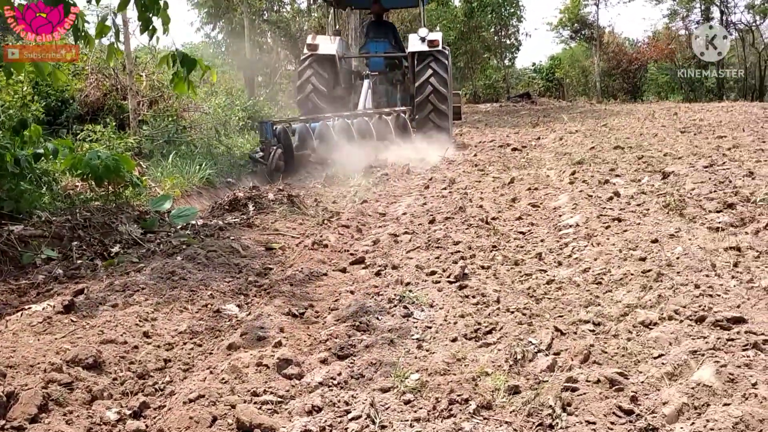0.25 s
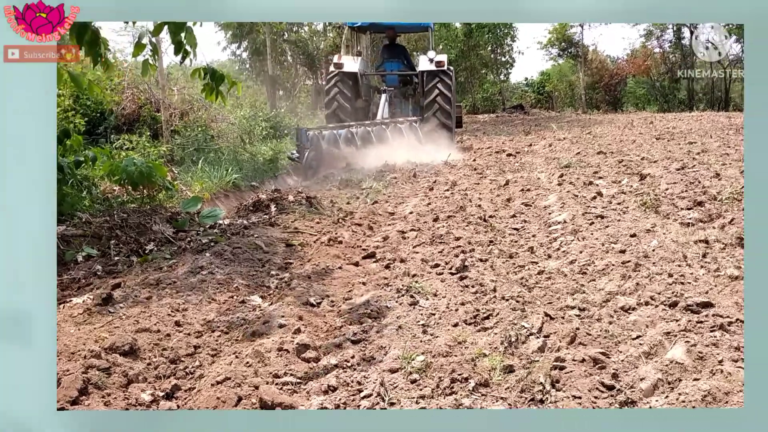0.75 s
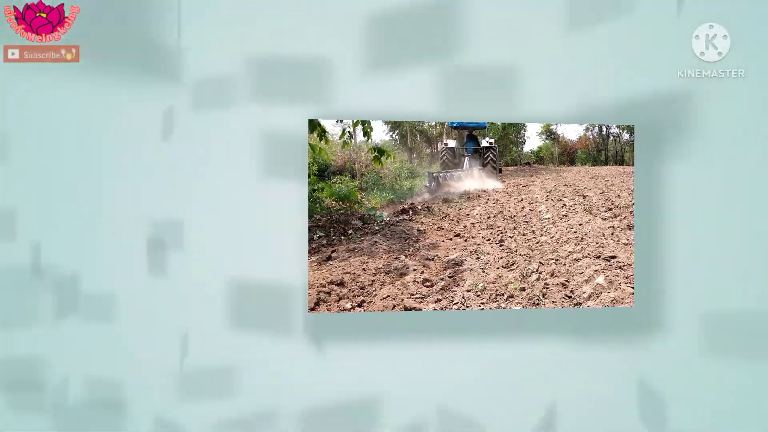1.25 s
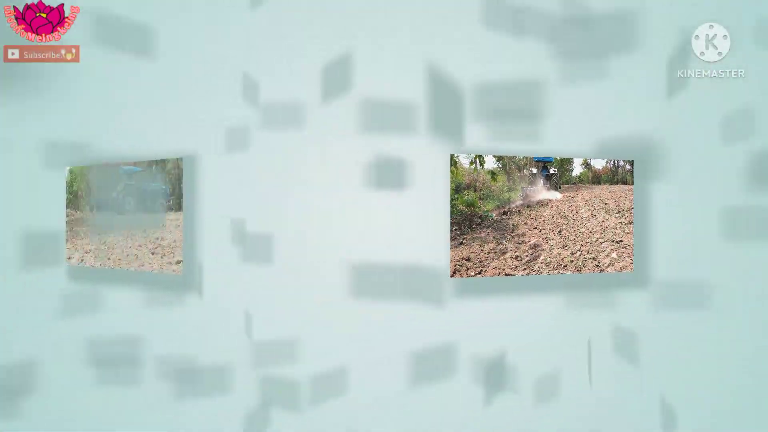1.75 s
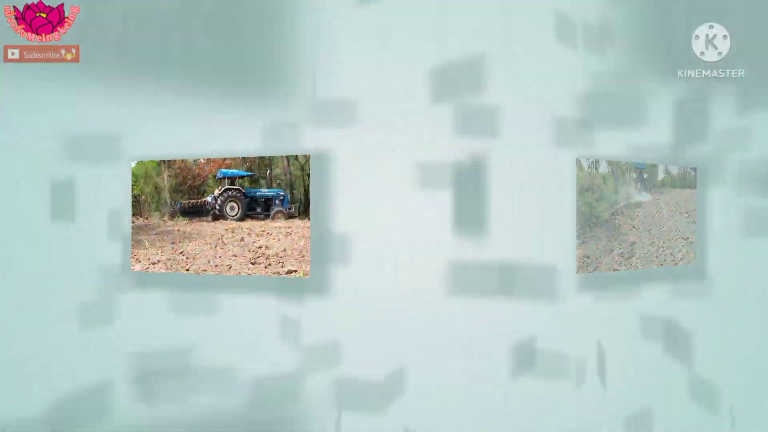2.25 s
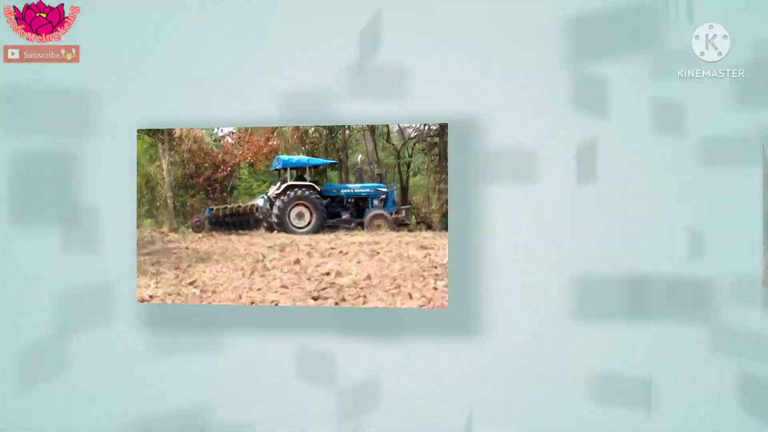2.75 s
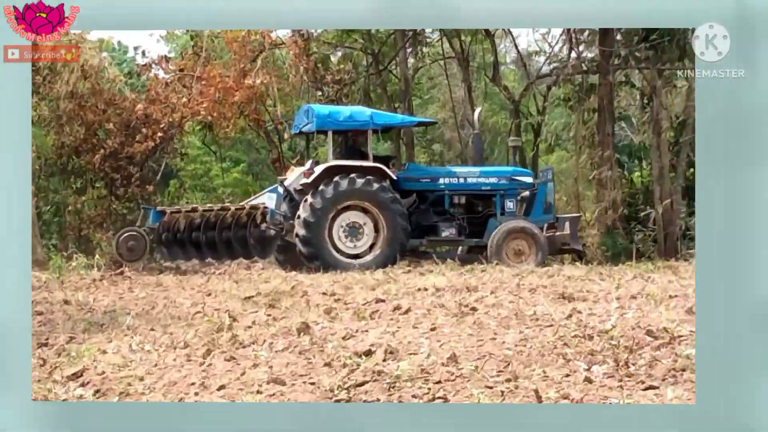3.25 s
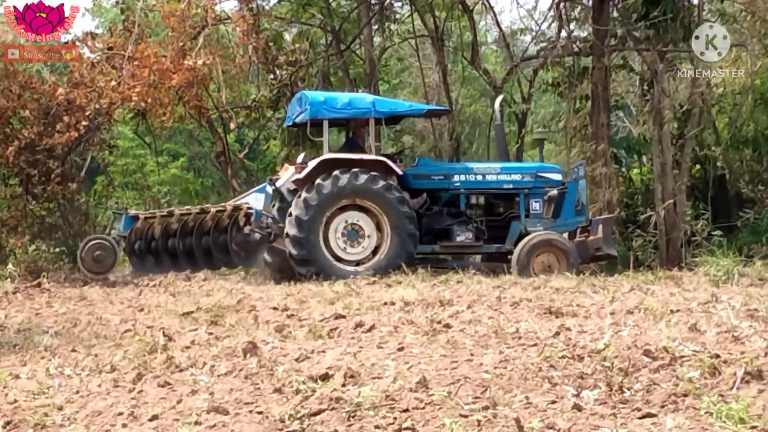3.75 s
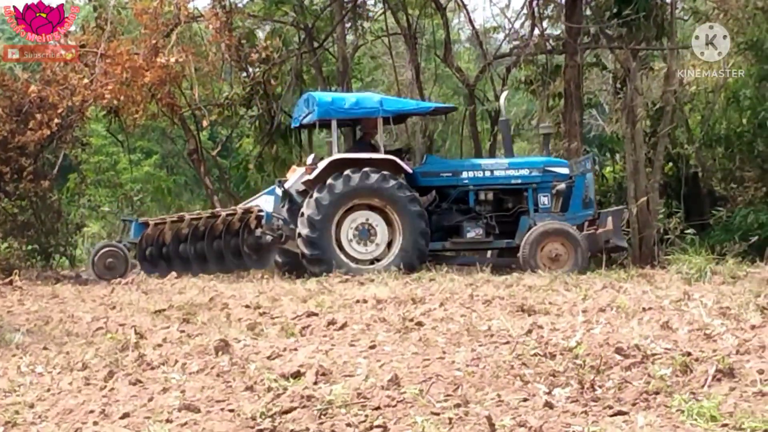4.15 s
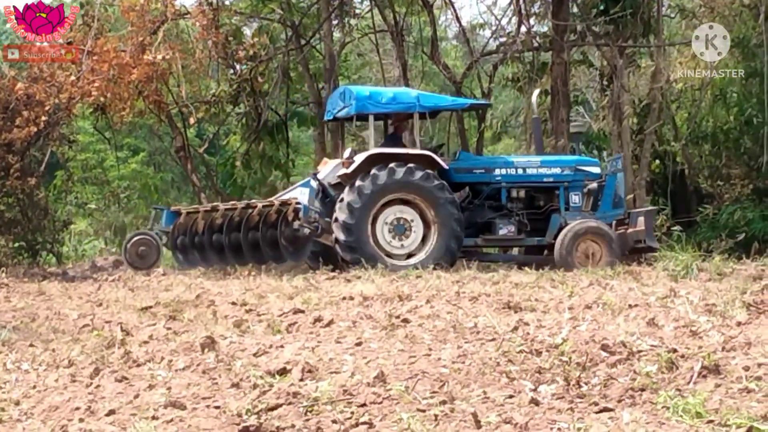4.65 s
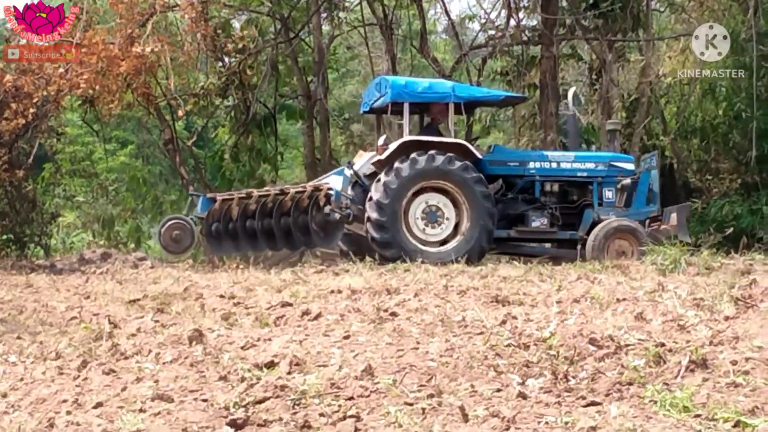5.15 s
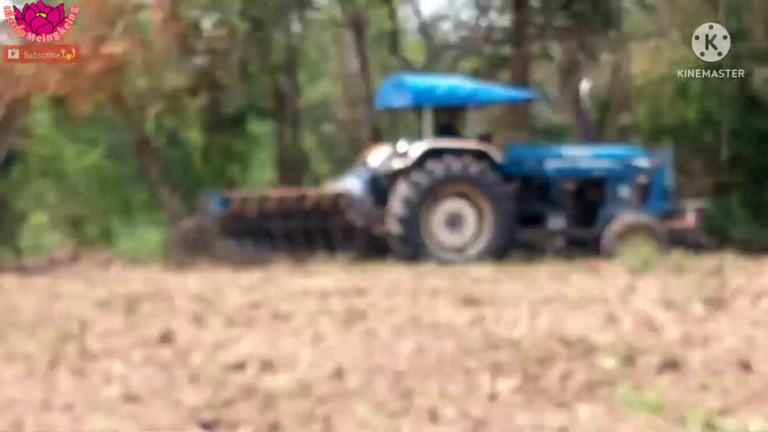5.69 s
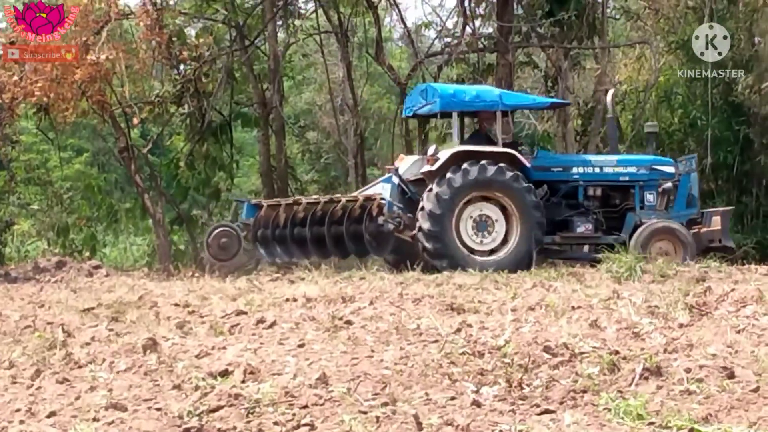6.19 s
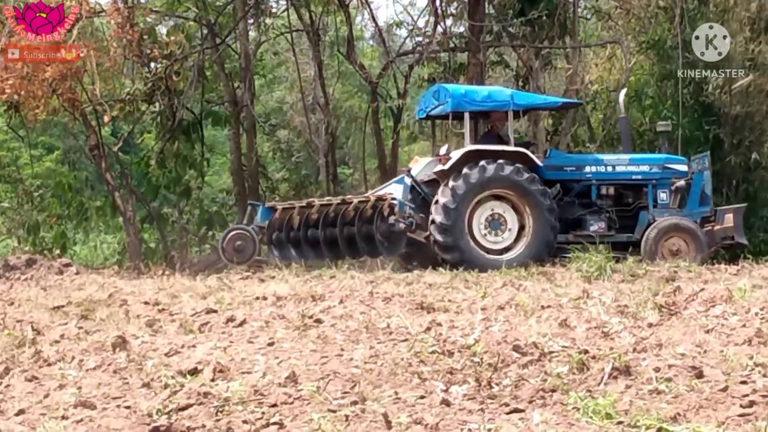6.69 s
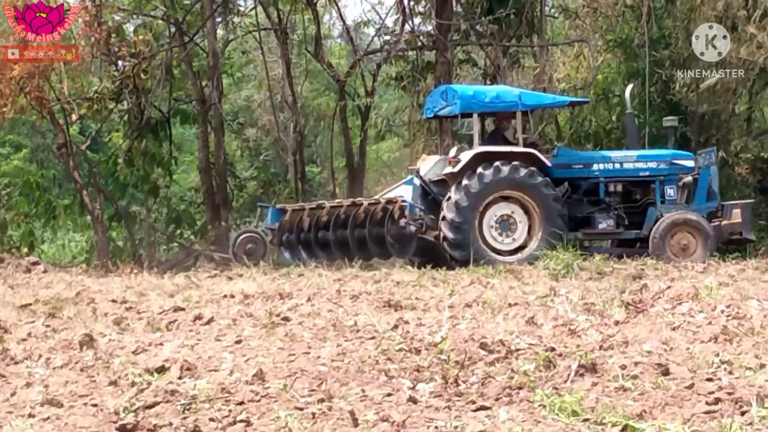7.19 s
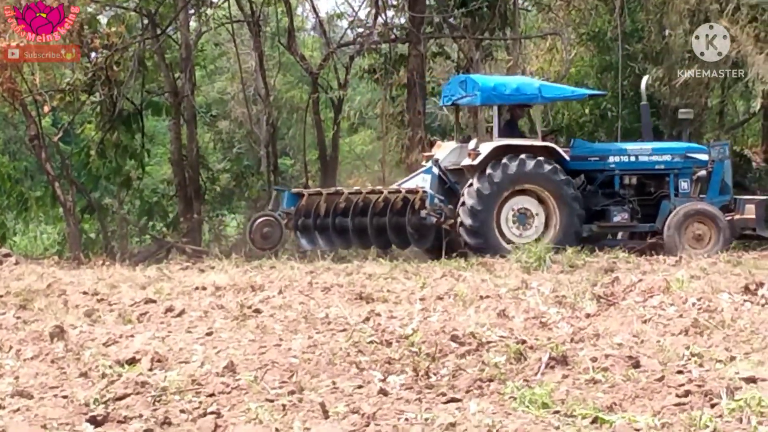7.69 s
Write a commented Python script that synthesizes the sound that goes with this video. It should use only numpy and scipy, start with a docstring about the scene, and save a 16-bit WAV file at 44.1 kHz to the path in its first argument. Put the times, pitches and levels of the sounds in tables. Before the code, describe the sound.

A diesel tractor close by drones and knocks steadily as it pulls a disc harrow through dry soil, with stones crunching and ringing against the discs. It recedes and blends into a quieter tractor farther off, chugging and clattering at low, slightly uneven revs with soft exhaust puffs. Faint stone ticks continue across the open field. Light wind buffets the microphone, gusting near the end.

```python
"""Exhaust drone, knocking block and discs grinding through clods and stones: a four-cylinder diesel
tractor, close by, pulls a disc harrow hard through dry, sandy soil. It fades into the tractor farther
off at low revs, chugging and puffing. Each firing pulses the exhaust and rings the block and panels.
Stones ring the discs, the frame clinks, a dry bearing chirps.
Light wind buffets the microphone, gusting at the end."""
import sys
import numpy as np
from scipy import signal
from scipy.fft import rfft, irfft, next_fast_len
from scipy.io import wavfile
from scipy.ndimage import map_coordinates

SR = 44100
rng = np.random.default_rng(int(sys.argv[2]) if len(sys.argv) > 2 else 0)


def transcribe(u):
    """Save the signal u as a 16-bit wav file named by the first command-line argument.

    u: samples, shape (n,) or (channels, n), limited to [-1, 1]; the rate is SR.
    q: integer samples, one column per channel.
    """
    v = np.clip(np.atleast_2d(u).T, -1, 1)
    q = np.round(v * 32767).astype(np.int16)
    wavfile.write(sys.argv[1], SR, q)


N = 349713

# wind spectrum: f/Hz, density/dB
BUFFET_SPECTRUM = [(10, 4), (22, 0), (50, 1), (70, -1), (120, -5), (200, -26), (500, -60)]
# gusts: t/s, level/dB, half length/s
GUSTS = [(7.33, -51, 0.17), (7.646, -41.5, 0.048), (7.9, -47, 0.17)]
# frame clinks: t/s, relative level/dB
CLINKS = [(2.369, -27.5)]
# steel frame modes: f/Hz, level/dB, t60/s
FRAME_MODES = [(2380, -4, 0.045), (2940, 0, 0.063), (3200, 3, 0.038), (4770, -14, 0.046), (6240, -11, .04),
               (8250, -1, 0.04), (8550, -8, .05), (9830, -6, 0.043)]
# bearing chirps: t/s, relative level/dB, upper tone's power share
CHIRPS = [(2.989, -60, 0.6), (3.115, -55, .2), (3.745, -56.5, .2), (6.9, -62, .5), (7.13, -65, 0.7),
          (7.21, -62, .1)]
# large stones and clods on the discs: t/s, level/dB, crunch centre/Hz, swell/s, t60/s
STONE_HITS = [(.012, -36.5, 2780, .005, .06), (.12, -30.5, 1900, .005, .09),
              (.341, -35, 14120, .001, 0.031), (.606, -32, 2610, 0.0022, .04),
              (.722, -36, 3800, .015, 0.078), (.785, -25, 2090, .0007, .035), (.794, -39, 2000, .002, .05),
              (.85, -44, 2300, .004, .05), (.881, -29, 2000, .002, 0.033), (.98, -42, 3850, .006, .07),
              (1.005, -35, 3180, .004, 0.061), (1.036, -43, 8000, .003, 0.054),
              (1.818, -36, 2300, .03, 0.17), (2.158, -49, 11400, .001, .037),
              (2.232, -45, 3000, .005, 0.087), (2.368, -41.5, 4440, 0.00088, 0.062),
              (2.43, -51.5, 6000, .008, 0.078), (2.464, -41, 2040, 0.0018, .06),
              (3.617, -58.5, 7950, .003, .07), (3.745, -57, 2470, .006, .1), (4.305, -62, 6250, .003, .08),
              (4.437, -64, 5600, .003, 0.091), (4.707, -62, 6300, .002, .08),
              (5.122, -59, 6080, .002, 0.063), (5.267, -58, 7500, .002, .08),
              (5.377, -55, 11400, .003, .09), (5.543, -59, 7900, .002, .08),
              (5.682, -49.5, 2350, .0007, .05), (6.232, -61, 5780, .002, .08),
              (6.52, -60.5, 6000, .002, 0.07), (6.778, -60, 11400, .002, .07),
              (7.353, -61, 8430, .002, 0.073), (7.493, -58.5, 8430, .002, 0.07),
              (7.637, -55, 8440, .002, 0.061), (7.709, -48, 2210, .0007, 0.046),
              (7.781, -56.5, 8400, .003, .11)]
# disc modes: f/Hz, width/Hz, level/dB
DISC_MODES = [(1900, 250, 9), (2620, 490, 1.5), (3190, 115, 3.5), (4240, 140, -3), (5670, 390, -0.5),
              (6530, 250, -7), (7720, 200, 0.5), (8460, 150, 5.5), (10940, 400, -5.5)]
# spectra of soil, far clatter and hiss: f/Hz, density/dB
SOIL_SPECTRUM = [(100, 4), (190, -0.5), (290, 2), (390, -7), (700, -7), (1000, -4.5), (1350, -4),
                 (1950, 0.5), (2350, -2.5), (2850, -3.5), (3600, -10), (6200, -16.5), (8300, -11),
                 (9800, -16), (15500, -13.5)]
CLATTER_SPECTRUM = [(130, 9), (215, -5.5), (310, -6), (440, -7), (620, -1.5), (740, -4), (1020, 3),
                    (1400, -3), (1730, -5), (2350, -4.5), (3100, -3), (4000, -12), (6000, -19.5),
                    (8100, -17.5), (12000, -23.5)]
HISS_SPECTRUM = [(500, -24), (2000, 9.5), (4600, 1.5), (5700, -2.5), (8000, -0.5), (12500, -3), (15500, 2)]
# echoes off wheels, bonnet and ground: delay/s, gain
ECHOES = [(.0019, 0.015), (.0031, 0.039), (.0053, 0.22)]
# engine speed; the far one hunts as the discs bite and come free: t/s, firing rate/Hz
FAR_FIRING_HZ = [(2.8, 32.59), (3.27, 28.25), (4.24, 29.16), (4.44, 31.3), (4.72, 28.5), (4.97, 29.37),
                 (5.21, 27.16), (5.33, 28.95), (6.2, 29.26), (6.39, 27.6), (7.14, 29.26), (7.93, 27.22)]
NEAR_FIRING_HZ = [(0.0, 44.97), (0.57, 45.31), (0.74, 44.11), (2.13, 44.77), (2.6, 44.02)]
# exhaust tones, fractions from unequal cylinders: multiple of firing rate, relative level/dB
FAR_ORDERS = [(1.0, -6), (1.5, -4), (2.0, 6), (3.0, 4.5), (4.0, -3.5), (5.0, -16)]
NEAR_ORDERS = [(0.75, -25), (1.0, 3), (1.25, -13), (2.0, -1.5), (2.25, -11.5), (3.25, -18), (3.5, -20.5),
               (4.0, -27), (5.0, -21.5), (9.0, -23.5)]
# knock per cylinder: relative level/dB
FAR_CYLINDERS_DB = [0.7, -0.13, -1.8, 1]
NEAR_CYLINDERS_DB = [-2, 1, -1.7, -4.5]
# far engine's load and puff hiss: t/s, level/dB
FAR_LOAD_DB = [(2.75, -11.5), (3.1, -5.5), (3.5, -3.5), (3.85, -2.5), (4.1, -4.5), (4.35, -2.5),
               (4.92, -0.5), (5.16, -6.5), (5.32, -0.5), (6.15, -2), (6.45, -4), (7.2, -3.5), (7.93, 0)]
PUFF_HISS_DB = [(2.8, -68.5), (3.4, -70), (4.15, -70), (4.52, -58.5), (4.7, -63), (4.87, -56), (5.01, -54),
                (5.25, -62.5), (5.7, -55.5), (6.03, -57.5), (6.35, -63.5), (6.9, -70), (7.45, -65),
                (7.87, -60.5)]
# ring of the panels and, more once drawn past, the side cover: t/s, relative level/dB
PANEL_RING_DB = [(3.3, -4.5), (4.1, -2), (4.55, 0), (4.9, -1.5), (5.17, -1.5), (5.4, -0.5), (5.95, -3),
                 (6.7, -2), (7.8, -1)]
COVER_RING_DB = [(4.0, -16), (6.62, -22), (6.73, -1), (7.2, -1), (7.93, -6)]
# modes of side panels, side cover and block from behind: f/Hz, width/Hz, level/dB
PANEL_MODES = [(520, 36, -8), (857, 9.6, 3), (1050, 34, 2.5), (1393, 91, -2.5), (1577, 56, -6),
               (1955, 95, -3.5), (2170, 97, -1), (2430, 160, -2), (4650, 140, -15.5), (7850, 230, -18),
               (8630, 200, -20.5)]
COVER_MODES = [(930, 130, -13.5), (1344, 250, -4.5), (1560, 200, -7), (2070, 240, -8.5)]
BLOCK_MODES = [(404.5, 17, -9), (443, 34, -5.5), (561, 90, -3), (817, 32, -0.5), (916, 57, -1.5),
               (1044, 16.6, 5), (1199, 21, -2.5), (1452, 33, -0.5), (1778, 55, -2.5), (2013, 79, -4.5),
               (2556, 150, -6), (2940, 38, -0.5), (3263, 33, -5), (4250, 61, -13.5), (4660, 110, -14.5)]


def from_db(db):
    """Decibels to gain."""
    return 10 ** (np.asarray(db) / 20)


def unit_rms(x):
    """Scale to rms 1."""
    return x / np.sqrt(np.mean(x ** 2) + 1e-20)


def noise(samples=N):
    """White noise."""
    return rng.standard_normal(samples)


def curve(rows):
    """Breakpoints to one value per sample."""
    return np.interp(np.arange(N) / SR, *np.transpose(rows))


def colour(x, spectrum):
    """Impose a smooth spectrum; rms 1."""
    hz, db = np.transpose(spectrum)
    size = next_fast_len(N + 8192)
    bins_hz = np.maximum(np.arange(size // 2 + 1) * SR / size, 1)
    gain = from_db(np.interp(np.log(bins_hz), np.log(hz), db))
    return unit_rms(irfft(rfft(x, size) * gain, size)[:N])


def drift(corner_hz):
    """Slow random wander; rms 1."""
    hop, settle = 40, 2000
    r = np.exp(-2 * np.pi * corner_hz * hop / SR)
    slow = signal.lfilter([1], [1, -2 * r, r * r], noise(N // hop + settle + 2))[settle:]
    return np.interp(np.arange(N) / hop, np.arange(len(slow)), unit_rms(slow))


def resonate(x, hz, width_hz):
    """One resonance; peak gain 1."""
    r = np.exp(-np.pi * width_hz / SR)
    feedback = [1, -2 * r * np.cos(2 * np.pi * hz / SR), r * r]
    return signal.lfilter(np.array([1, 0, -1]) * (1 - r * r) / 2, feedback, x)


def body(x, modes):
    """Parallel resonances of alternating sign; rms 1."""
    return unit_rms(sum((-1) ** k * from_db(db) * resonate(x, hz, width_hz)
                        for k, (hz, width_hz, db) in enumerate(modes)))


def reflect(x):
    """Early echoes ripple the spectrum."""
    n = np.arange(N)
    return x + sum(gain * np.interp(n - np.round(delay_s * SR), n, x, left=0)
                   for delay_s, gain in ECHOES)


def blend(a, b, share):
    """Constant-power mix; share is that of b."""
    return np.sqrt(1 - share) * a + np.sqrt(share) * b


def add(out, at_s, sound):
    """Mix a short sound in."""
    i = int(at_s * SR)
    out[i:i + len(sound)] += sound[:N - i]


def wind(near_gain):
    """Low, lumpy buffeting: a breeze, stronger by the close tractor, plus gusts."""
    t = np.arange(N) / SR
    gusts = sum(from_db(db) * np.exp(-((t - at_s) / half_s) ** 2) for at_s, db, half_s in GUSTS)
    strength = from_db(-57) + near_gain * from_db(-52.5) + gusts
    return strength * from_db(1.7 * drift(9.3)) * colour(noise(), BUFFET_SPECTRUM)


def frame_clinks():
    """The harrow's steel frame rings in its modes."""
    out, t = np.zeros(N), np.arange(SR // 4) / SR
    for at_s, db in CLINKS:
        for hz, mode_db, t60_s in FRAME_MODES:
            ring = np.sin(2 * np.pi * hz * t) * from_db(-60 * t / t60_s)
            add(out, at_s, from_db(db + mode_db - 9 + rng.normal(0, 1.1)) * ring)
    return out


def bearing_chirps(tones_hz=(8070, 10830), swell_s=0.0084):
    """A dry disc bearing chirps in two thin tones."""
    out, t = np.zeros(N), np.arange(SR // 4) / SR
    envelope = t / swell_s * np.exp(1 - t / swell_s)
    for at_s, db, upper_share in CHIRPS:
        low, high = (unit_rms(resonate(noise(len(t)), hz, width_hz=180)) for hz in tones_hz)
        add(out, at_s, from_db(db - 3) * blend(low, high, upper_share) * envelope)
    return out


def pebble_hits(near_gain, per_s=7, spread_db=5, spread_octaves=0.59, swell_s=0.0015, t60_s=0.067):
    """Small stones hit at random, fainter far off; rows as in STONE_HITS."""
    hits = []
    for when, size, pitch in rng.random((int(per_s * N / SR), 3)):
        mean_db = 20 * np.log10(near_gain[int(when * N)] * from_db(-50.5) + from_db(-65))
        hz = 6160 * 2 ** (spread_octaves * (2 * pitch - 1))
        hits.append((when * N / SR, mean_db + spread_db * (2 * size - 1), hz, swell_s, t60_s))
    return hits


def stones(near_gain):
    """Each stone bites, scrapes a disc and rings it; soil damps the ring."""
    out, t = np.zeros(N), np.arange(SR // 4) / SR
    for at_s, db, hz, swell_s, t60_s in list(STONE_HITS) + pebble_hits(near_gain):
        band_hz = 0.74 * hz
        crunch = resonate(resonate(noise(len(t)), hz, band_hz), hz, band_hz)
        ring = sum(from_db(mode_db) * resonate(crunch, mode_hz, width_hz)
                   for mode_hz, width_hz, mode_db in DISC_MODES)
        envelope = (1 - np.exp(-t / swell_s)) * from_db(-60 * t / t60_s)
        knock = unit_rms(ring + from_db(-10) * crunch) * envelope / envelope.max()
        add(out, at_s, from_db(db) * knock)
    return out


def grit(per_s, spread_db):
    """Random clicks of uneven size, as of dry crumbs breaking; rms 1."""
    sizes = from_db(spread_db * np.minimum(rng.exponential(1, N), 4))
    return unit_rms(noise() * sizes * (rng.random(N) < per_s / SR))


def firings(firing_hz, start_count):
    """Running firing count and mean breakpoint rate/Hz."""
    return start_count + np.cumsum(curve(firing_hz)) / SR, np.mean(firing_hz, axis=0)[1]


def bursts(fired, cylinders_db, rise_periods, decay_periods, rough_db):
    """Each firing swells and dies at its cylinder's strength, with random scatter; rms 1."""
    number, age = fired.astype(int), fired % 1
    strength = from_db(np.array(cylinders_db)[number % 4] + rough_db * noise(number.max() + 1)[number])
    return unit_rms(strength * (1 - np.exp(-age / rise_periods)) ** 2 * np.exp(-age / decay_periods))


def rattle(fired, firing_hz, repeat_share):
    """Valves, gears and injectors repeat every four firings; the rest is fresh noise."""
    size = int(4 * SR / firing_hz)
    pattern = map_coordinates(noise(size), [fired / 4 % 1 * size], order=3, mode="grid-wrap")
    return blend(noise(), pattern, repeat_share)


def exhaust(fired, orders, waver_db, bass_cut_db=0, lag_periods=0.202):
    """One pressure pulse leaves the stack after each knock; its tones waver."""
    out = 0
    for multiple, db in orders:
        level_db = db + waver_db * drift(3) - bass_cut_db * (multiple <= 1)
        out -= from_db(level_db) * np.cos(2 * np.pi * multiple * (fired - lag_periods))
    return out / np.sqrt(sum(from_db(db) ** 2 for _, db in orders) / 2)


def far_clatter(fired, firing_hz, beat):
    """Firings rattle the engine and ring panels and cover; scatter off trees fills the gaps."""
    blows = blend(noise(), rattle(fired, firing_hz, repeat_share=0.44) * beat, 0.3)
    panels = from_db(curve(PANEL_RING_DB)) * body(noise() * (1.1 + beat), PANEL_MODES)
    cover = from_db(curve(COVER_RING_DB)) * body(noise() * (0.5 + beat), COVER_MODES)
    return from_db(1) * colour(blows, CLATTER_SPECTRUM) + panels + cover


def exhaust_puffs(fired, beat):
    """Each puff spits and rushes, some harder than others."""
    spit = grit(per_s=7600, spread_db=5)
    spit *= bursts(fired + 0.091, FAR_CYLINDERS_DB, rise_periods=0.18, decay_periods=0.17, rough_db=3.5)
    return from_db(curve(PUFF_HISS_DB)) * colour(blend(noise() * beat, spit, 0.3), HISS_SPECTRUM)


def far_tractor():
    """Low revs: each firing a separate thud, clatter and puff, over faint leaves and soil."""
    fired, firing_hz = firings(FAR_FIRING_HZ, start_count=3.563)
    load_db = curve(FAR_LOAD_DB)
    chug = from_db(-42.5 + load_db) * exhaust(fired, FAR_ORDERS, waver_db=0.7)
    beat = bursts(fired + 0.16, FAR_CYLINDERS_DB, rise_periods=0.085, decay_periods=0.4, rough_db=1.8)
    clatter = from_db(-53 + 0.57 * load_db) * far_clatter(fired, firing_hz, beat)
    puffs = exhaust_puffs(fired, beat)
    leaves = from_db(-73) * colour(noise(), HISS_SPECTRUM)
    soil = from_db(-66.5) * colour(grit(per_s=5000, spread_db=-0.5), SOIL_SPECTRUM)
    return chug + reflect(clatter + puffs + soil + leaves)


def fan(fired, ratio=4.05):
    """The belt-driven fan hums at a multiple of the firing rate."""
    return from_db(-14 + 2 * drift(3.2)) * np.sin(2 * np.pi * ratio * fired)


def piston_ping(fired, lead_periods=0.082):
    """Combustion slaps the piston over; the cylinder wall pings just before the knock."""
    slap = noise() * bursts(fired + lead_periods, NEAR_CYLINDERS_DB,
                            rise_periods=0.019, decay_periods=0.094, rough_db=1.6)
    return unit_rms(resonate(resonate(slap, hz=925, width_hz=127), hz=1012, width_hz=190))


def block_knock(fired, firing_hz):
    """The rattle swells at each firing and rings the block."""
    blows = rattle(fired, firing_hz, repeat_share=0.45)
    beat = bursts(fired, NEAR_CYLINDERS_DB, rise_periods=0.04, decay_periods=0.44, rough_db=0)
    return body(blows * (1.4 + beat), BLOCK_MODES)


def soil_grind(fired, firing_hz):
    """Discs grind dry soil: crumbs mixed with rattle, at a fluttering level."""
    crumbs = blend(rattle(fired, firing_hz, repeat_share=0.56), grit(per_s=6000, spread_db=0.5), 0.39)
    return colour(crumbs * from_db(1.28 * drift(9.6)), SOIL_SPECTRUM)


def near_tractor(bass_cut_db_per_s=1.3):
    """Under load: drone, fan, knock, soil and ping; the bass thins as it draws away."""
    t = np.arange(N) / SR
    fired, firing_hz = firings(NEAR_FIRING_HZ, start_count=3.541)
    drone = exhaust(fired, NEAR_ORDERS, waver_db=1, bass_cut_db=bass_cut_db_per_s * t)
    hum = fan(fired)
    knock = from_db(-3.5) * block_knock(fired, firing_hz)
    soil = from_db(-0.5) * soil_grind(fired, firing_hz)
    ping = from_db(-9.5) * piston_ping(fired)
    return from_db(-30.5) * (drone + hum) + from_db(-33) * reflect(knock + soil + ping)


def scene():
    """The close tractor recedes and fades out as the far one fades in; mono."""
    t = np.arange(N) / SR
    recede_db_per_s, fade_out_at_s, fade_out_s = 1.72, 0.79, 2.86
    fade_in_at_s, fade_in_s = 1.7, 1
    fade_out = np.clip(1 - (t - fade_out_at_s) / fade_out_s, 0, 1) ** 1.305
    near_gain = from_db(-recede_db_per_s * t) * fade_out
    far_gain = np.clip((t - fade_in_at_s) / fade_in_s, 0, 1)
    tractor = near_gain * near_tractor() + far_gain * far_tractor()
    harrow = stones(near_gain) + frame_clinks() + bearing_chirps()
    return (tractor + harrow + wind(near_gain))[None]


def record(dry):
    """Steep low-pass."""
    cutoff_hz = 15520
    return signal.sosfilt(signal.ellip(12, 0.1, 90, cutoff_hz, fs=SR, output="sos"), dry)


dry = scene()
out = record(dry)
transcribe(out)
```